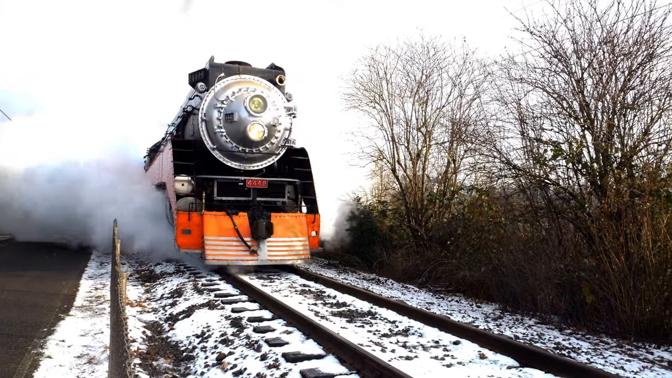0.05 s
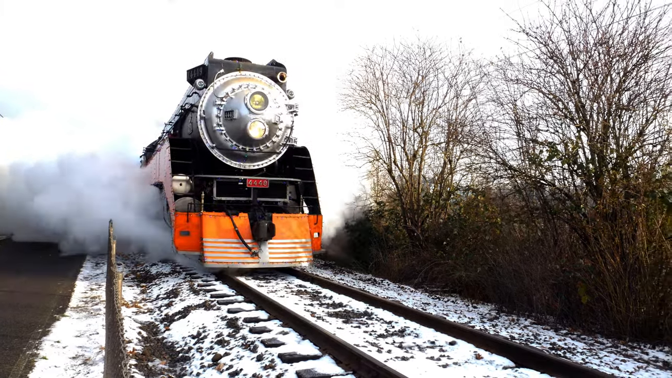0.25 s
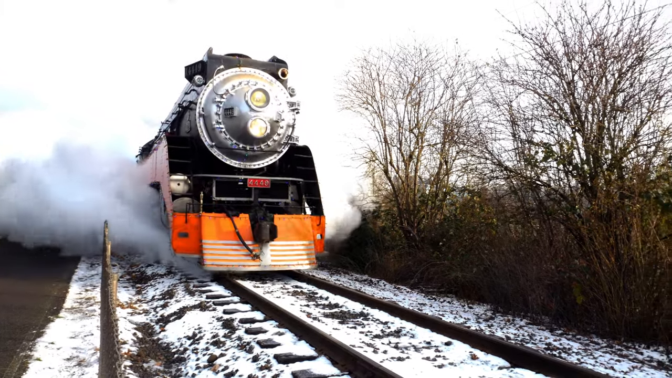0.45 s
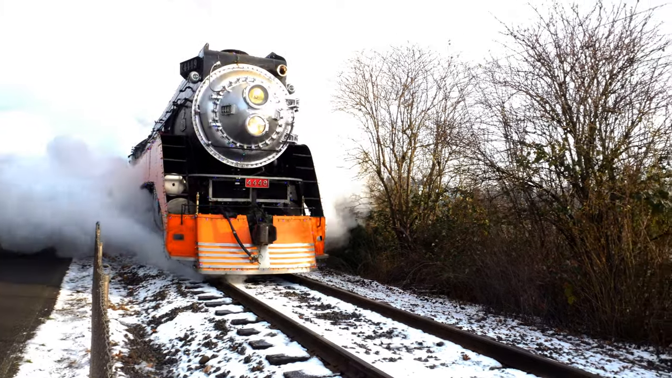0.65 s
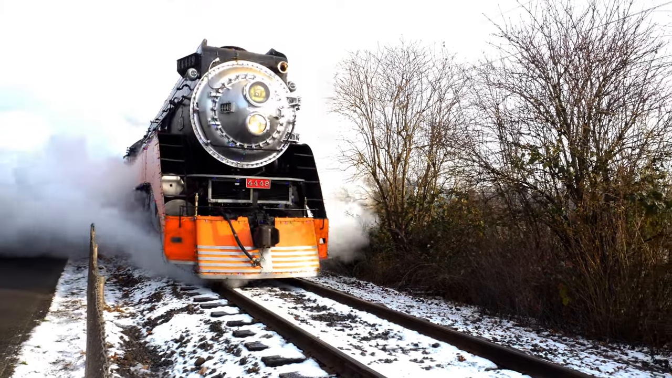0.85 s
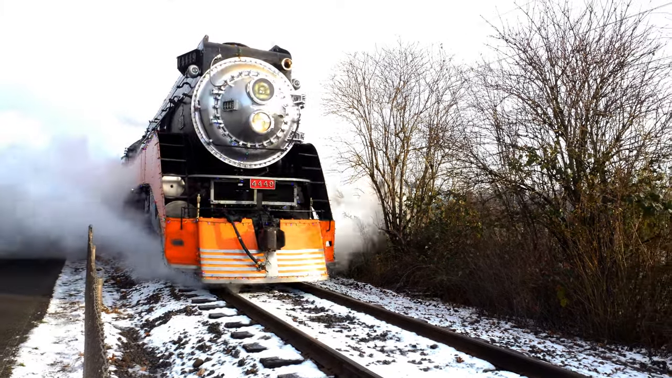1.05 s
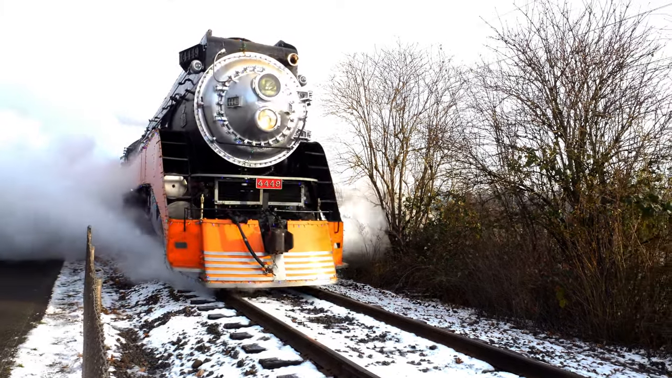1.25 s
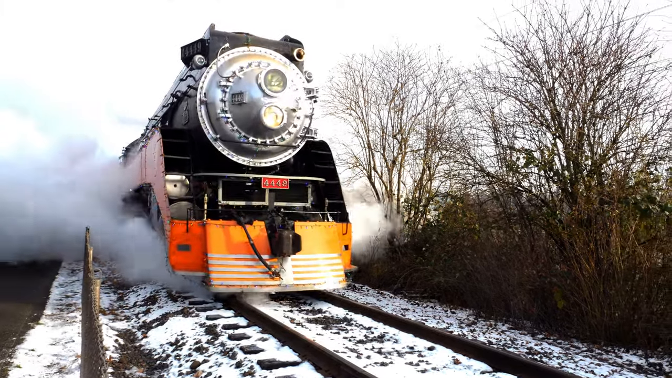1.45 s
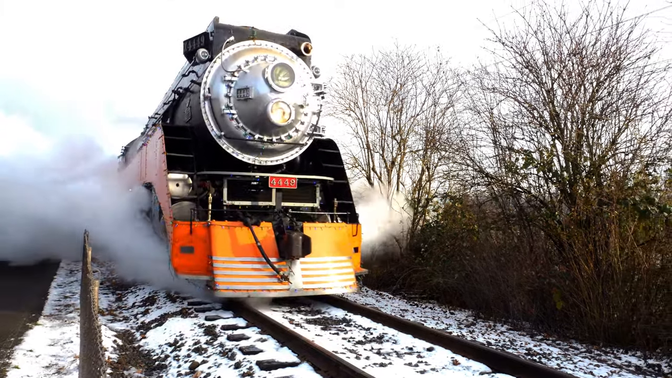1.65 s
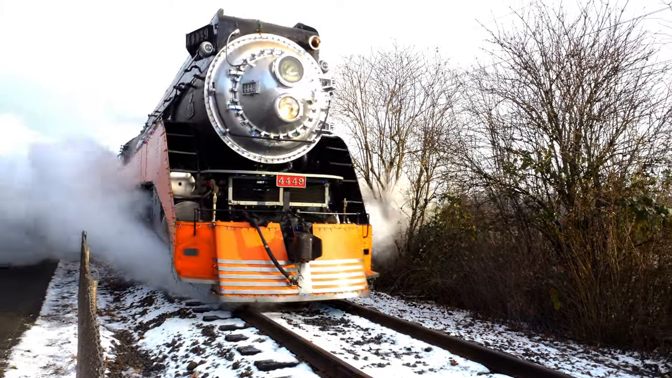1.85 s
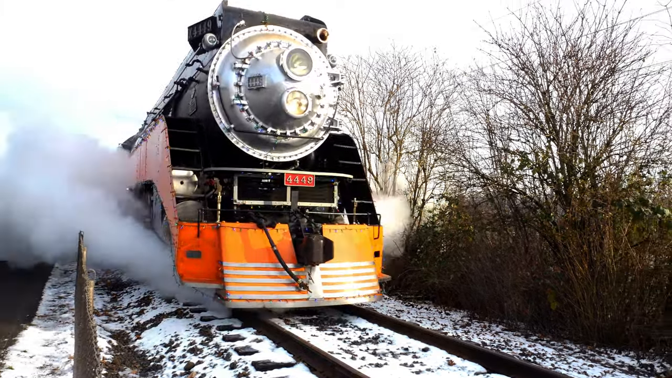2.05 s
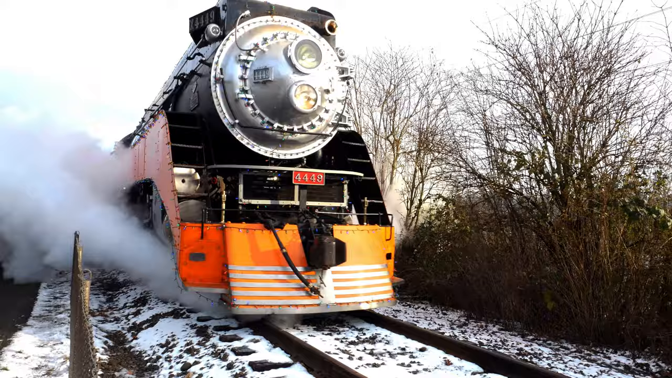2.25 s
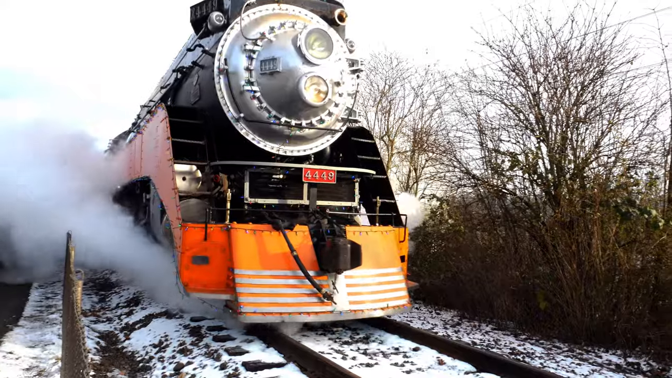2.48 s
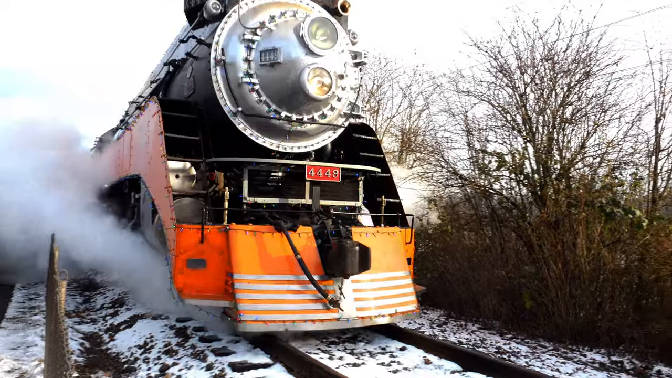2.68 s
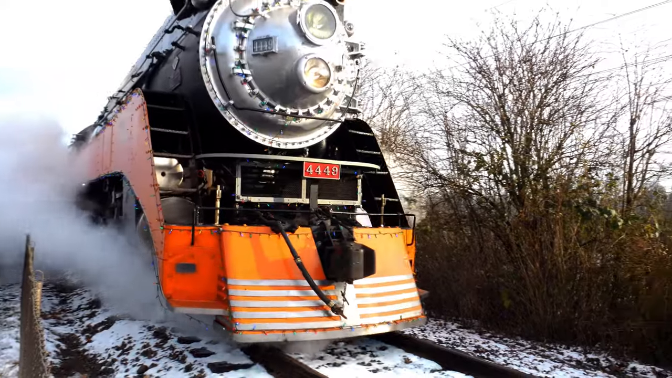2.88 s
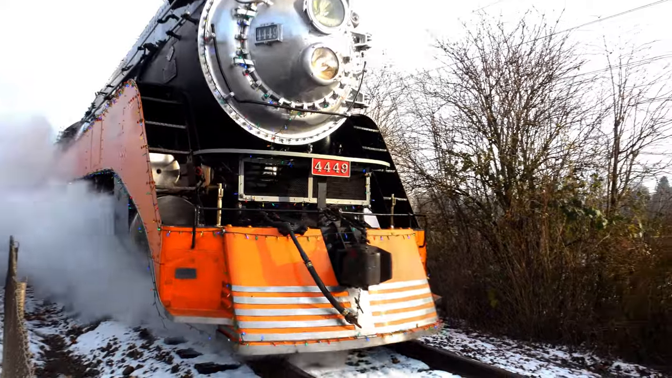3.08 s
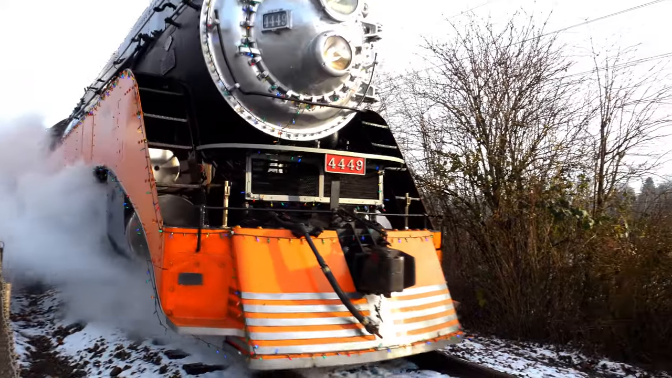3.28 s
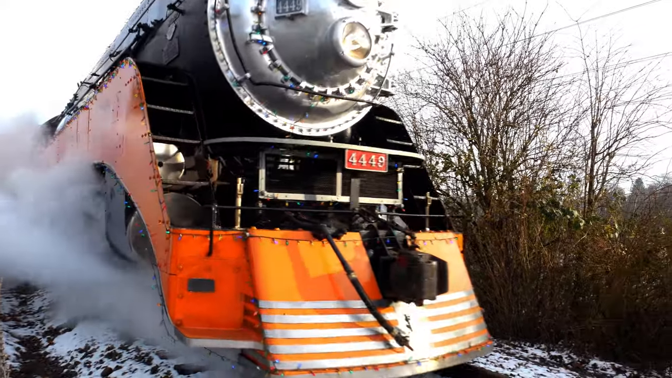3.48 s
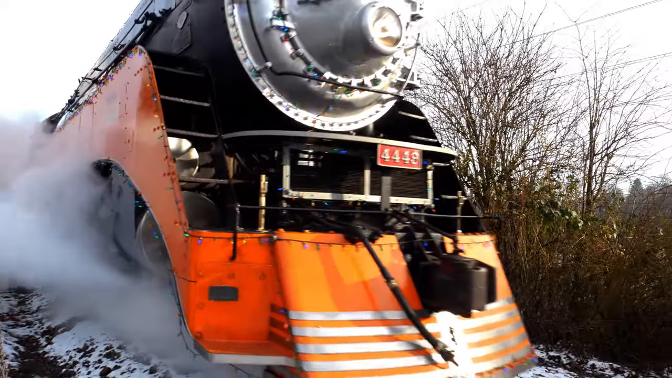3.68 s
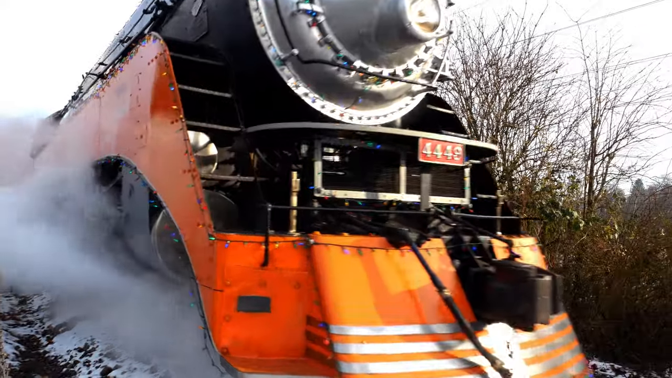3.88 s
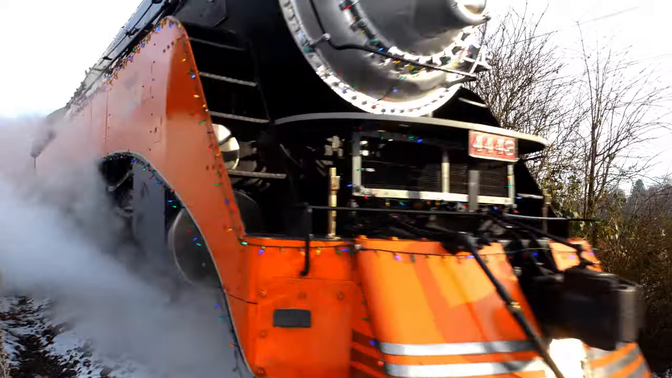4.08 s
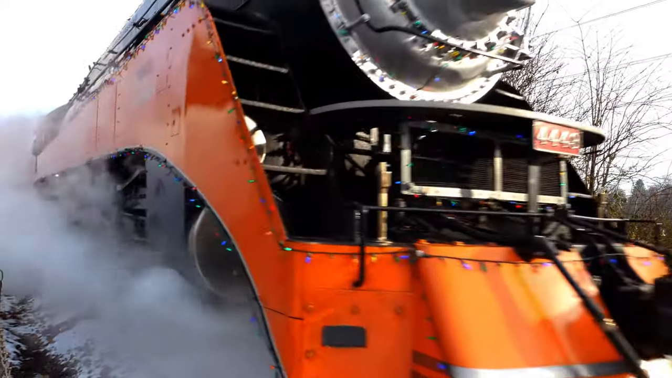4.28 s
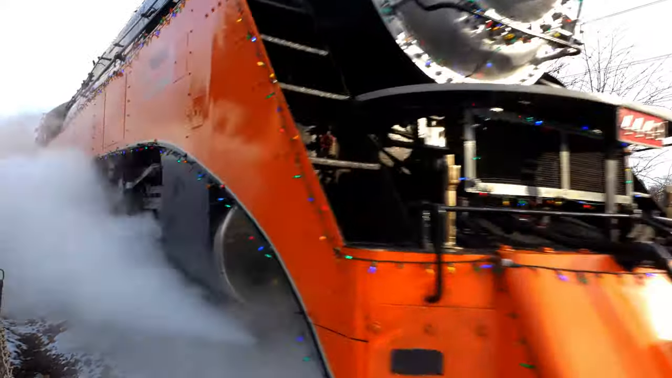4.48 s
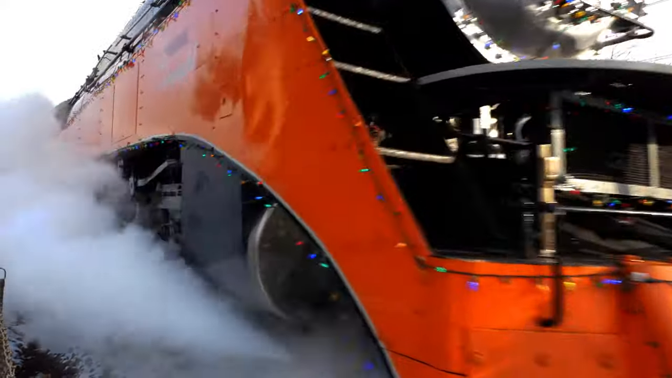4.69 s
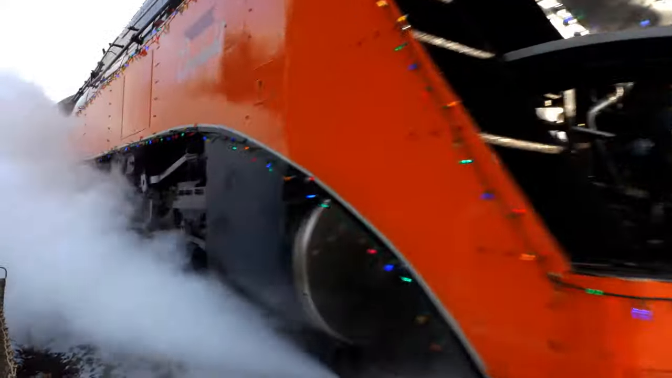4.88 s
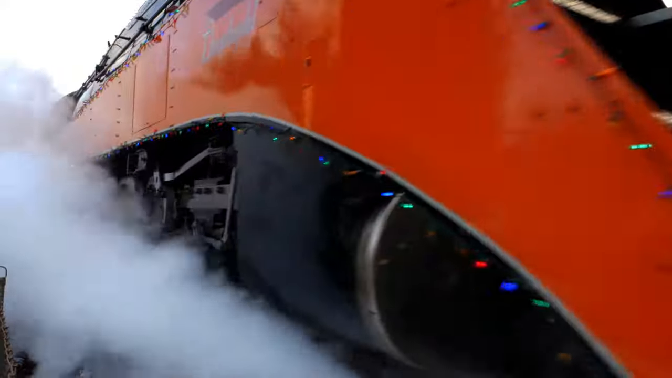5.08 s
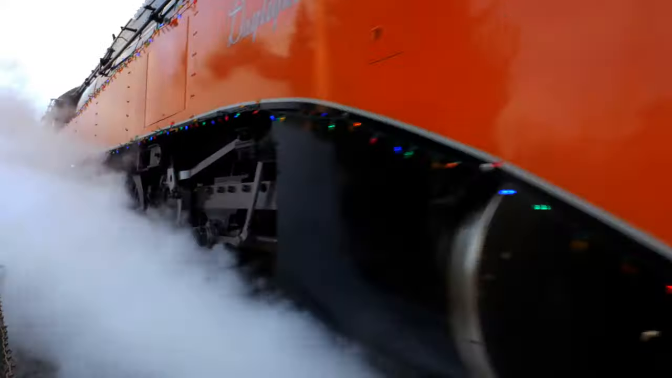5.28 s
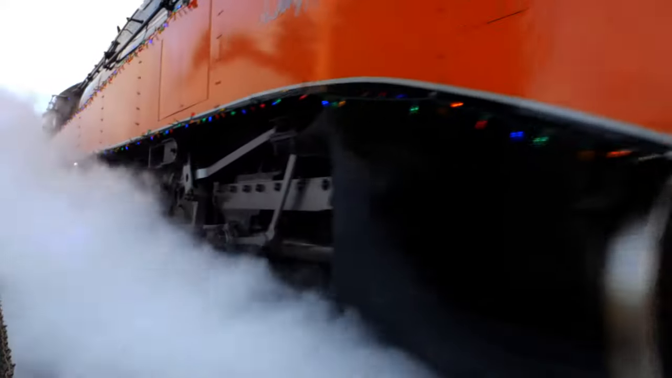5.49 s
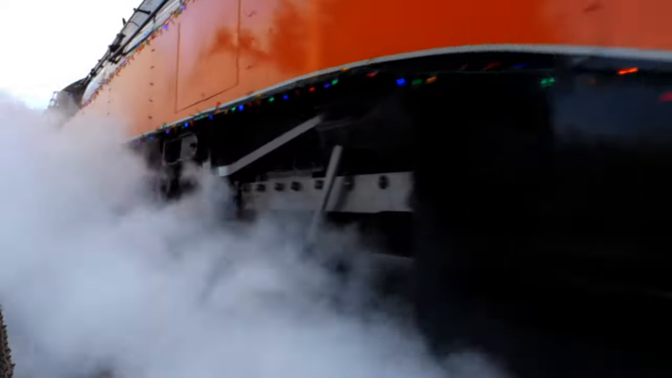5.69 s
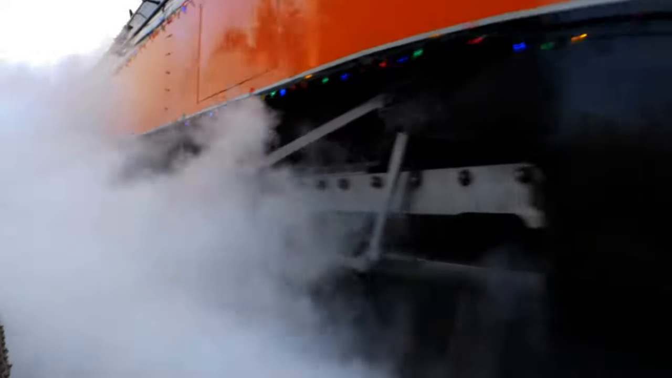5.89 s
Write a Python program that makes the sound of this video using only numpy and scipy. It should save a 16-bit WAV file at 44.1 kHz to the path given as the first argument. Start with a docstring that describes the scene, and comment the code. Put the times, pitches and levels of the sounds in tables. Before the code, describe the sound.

A steam locomotive rolls slowly towards a trackside microphone outdoors. From the start, steam hisses continuously: a rough billowing roar, light fizz and a hoarse, wavering ring near 3 kHz. It surges with piston strokes at about 0-0.5, 0.8-1.2, 1.8-2.25, 2.55-3.1 and 3.3-4 seconds, growing fuller and brighter. Beneath, soft hollow low chuffs fall slightly in pitch, at roughly 0.6, 1.4, 2.1, 2.9, 3.6, 4.3 and 5.7 seconds, with deeper boom as they near. Wheels and rods add a quiet, lumpy rumble. Around 4-4.4 the jets ahead drop as the front draws level. At 4.45 a nearby cock coughs open and builds into a huge, dense, fizzing blast with low wind buffeting, roughened by microphone overload. It shuts abruptly near 5.6, leaving a brief weaker hiss, then a faster, thumping second blast starts at about 5.77 and lasts to the end. Narrow stereo, dry.

```python
"""Steam jets hiss and ring hoarsely near 3 kHz as a steam locomotive rolls slowly up, cylinder cocks open.
The jets are noise shaped into a roar, a fizz and a ring, which surge with the piston strokes.
Then the nearest cock blows straight past, one long blast and one short, and overloads the microphone.
Behind the jets, soft chuffs from the stack come roughly every three quarters of a second: noise in
gliding resonances. The wheels and rods add a lumpy low rumble of filtered noise."""
import sys
import numpy as np
from scipy import signal
from scipy.io import wavfile
from scipy.ndimage import uniform_filter1d

SR = 44100
rng = np.random.default_rng(int(sys.argv[2]) if len(sys.argv) > 2 else 0)


def master_out(mix):
    """Clip the mix to full scale and print it as 16-bit PCM to the path in sys.argv[1]."""
    frames = np.transpose(np.atleast_2d(mix))
    ceiling = np.clip(frames, -1, 1)
    pcm = np.round(ceiling * 32767).astype(np.int16)
    wavfile.write(sys.argv[1], SR, pcm)


N = 261951  # length in samples

# spectrum shapes of the jets' roar and fizz; only the shape counts: f/Hz, density/dB
JET_ROAR_SPECTRUM = [(100, -42), (450, -15.5), (800, -9), (1150, -5.5), (1650, -1.5), (2100, -2.5),
                     (2700, 0), (4000, -1), (4700, -6), (5500, -10), (8000, -13), (16000, -37)]
JET_FIZZ_SPECTRUM = [(2000, -26), (4000, 1.5), (5500, -2), (6600, -1.5), (8500, -3.5), (12000, -5),
                     (14000, -9), (16000, -14)]
# surges that the piston strokes drive through the open cocks; each part of the sound
# takes its own share of the strength: start/s, end/s, strength/dB
STROKES = [(0.032, 0.513, 2.0), (.78, 1.238, 2.0), (1.766, 2.25, 2.5), (2.55, 3.146, 3),
           (3.288, 4.015, 3.5)]
# centre of the hoarse ring of the cock mouths: t/s, f/Hz
RING_CENTRE = [(0.0, 3560), (0.1, 3320), (0.89, 2980), (0.92, 3250), (3.35, 3170), (3.47, 3350),
               (3.52, 3240), (4.21, 3340), (4.29, 3180), (4.52, 3400), (4.73, 3160), (4.78, 3340),
               (5.27, 3250), (5.36, 3100), (5.9, 3180)]
# chance hollow tints in the hiss: t at the top/s, level/dB, length/s, centre f/Hz, width/Hz
HOLLOW_TINTS = [(.35, -35, 1.5, 930, 276), (1.35, -38, 0.5, 1150, 130), (2.62, -29, 0.5, 1820, 120),
                (3.15, -31.5, 0.52, 1600, 130), (3.4, -33, 0.37, 1130, 130)]
# blasts of the nearest cock: opens/s, shut/s, pressure build-up time/s, pressure/dB
BLASTS = [(4.436, 5.615, 0.16, -0.5), (5.765, 6.1, 0.035, 0.2)]
# spectrum shapes of the blasts' roar, fizz and wind on the microphone: f/Hz, density/dB
BLAST_ROAR_SPECTRUM = [(40, -29), (300, -14), (550, -8), (900, -3.5), (1300, -1), (2000, 1.5), (2800, 0),
                       (4300, -3), (5500, -4.5), (9000, -15.5), (16000, -41)]
BLAST_FIZZ_SPECTRUM = [(1500, -8), (3500, -2), (4800, -1), (5700, -3), (7200, 0.5), (9000, -0.5),
                       (12000, -2.5), (14500, -4.5), (16000, -12)]
WIND_SPECTRUM = [(15, -8), (45, -5), (90, -3), (160, -5.5), (300, -14), (800, -26)]
# brief gusts as the cock coughs open or its wind thumps the microphone:
# t at the top/s, level/dB, length/s, centre f/Hz, width/Hz
PUFFS = [(4.458, -26, 0.051, 804, 700), (4.56, -37, .06, 65, 70), (5.786, -23.5, 0.029, 330, 170),
         (5.795, -21, 0.064, 900, 500), (5.91, -18, 0.037, 60, 110)]
# exhaust beats: t at the top/s, level/dB, length/s, stack resonance at the top f/Hz
CHUFFS = [(0.605, -32, 0.19, 208), (1.381, -35, 0.14, 188), (2.136, -35, 0.14, 180.6),
          (2.877, -31, 0.18, 197), (3.631, -39, 0.2, 191), (4.275, -35, 0.12, 222),
          (5.667, -33.5, 0.13, 193.5)]
# spectrum shape of the wheels and rods: f/Hz, density/dB
GEAR_SPECTRUM = [(20, -10), (45, -2.5), (90, 0.5), (170, 1), (300, -2), (500, -2), (750, 0.5), (1200, -3.5),
                 (3000, -40)]
# the stereo difference relative to the middle, before it wavers: f/Hz, level/dB
STEREO_WIDTH = [(30, -17.5), (500, -18), (1400, -20.5), (3200, -22), (5000, -16), (8000, -17.5),
                (15000, -16.5)]

STROKE_RAMP_S = .25  # time for a surge to rise or fall
# the jets grow as the engine nears, fall away while its front draws level, then recede
LEVEL_FROM_S, LEVEL_TAKES_S, RECEDE_DB_PER_S = 3.95, 0.45, 1.5
SHUT_S, LEAK_DB = 0.081, -23.5  # the valve's closing time; the least pressure once it has first opened
ROAR_LAW, RING_LAW = 0.28, 0.51  # roar and ring grow as these powers of the pressure
# a beat's deep boom, relative to the beat, grows with the approach up to the near level
BOOM_FAR_DB, BOOM_DB_PER_S, BOOM_NEAR_DB = -20, 5.5, 3
EDGE_HZ = 15850  # top of the sound
FRAME, HOP = 1024, 256  # short-time frame and step in samples
HZ = np.fft.rfftfreq(FRAME, 1 / SR)  # frequency of each bin
T = np.arange(N // HOP + 5) * HOP / SR  # time of each frame in seconds


def jets():
    """Steam beside the cylinders: a billowing roar, and a fizz that grows faster as the engine nears."""
    roar_db = approach(far_db=-22.5, db_per_s=0.79, surge=.9, drop_db=5.5)
    fizz_db = approach(far_db=-31.0, db_per_s=2.5, surge=0.6, drop_db=10.0)
    roar_billow = eddies(depth_db=2.0, life=0.21, span_hz=208)
    fizz_billow = eddies(depth_db=1.0, life=0.2, span_hz=350)
    roar = gain_of(roar_db) * unit(colour(JET_ROAR_SPECTRUM)) * roar_billow
    fizz = gain_of(fizz_db) * unit(colour(JET_FIZZ_SPECTRUM)) * fizz_billow
    sputter = eddies(depth_db=.5, life=0.017, span_hz=7000)
    return noise(np.hypot(roar, fizz) * sputter)


def cock_ring(body_db=-4.0, core_db=-3, near_db=-16.0, fade_db_per_s=6.0):
    """Jets excite the cock mouths: a broad unsteady ring, a narrower whistling core; the nearest fades."""
    hz, = follow(RING_CENTRE)
    ahead = gain_of(approach(far_db=-25.0, db_per_s=0.68, surge=0.91, drop_db=2.0))
    since_opening = T[:, None] - BLASTS[0][0]
    nearest = cock_pressure() ** RING_LAW * gain_of(near_db - fade_db_per_s * since_opening)
    body_eddies = eddies(depth_db=1.8, life=0.06, span_hz=500)
    core_eddies = eddies(depth_db=2, life=.1, span_hz=120)
    body = unit(resonance(hz, width_hz=680)) * gain_of(body_db) * body_eddies
    core = unit(resonance(hz, width_hz=260)) * gain_of(core_db) * core_eddies
    flutter = eddies(depth_db=0.8, life=0.13, span_hz=5000)
    return noise(np.hypot(ahead, nearest) * np.hypot(body, core) * flutter)


def hollow_tints():
    """Chance hollow tints in the hiss: noise that swells and fades around one pitch."""
    return gusts(HOLLOW_TINTS)


def blasts(roar_db=-14.0, fizz_db=-10.6, wind_db=-29):
    """Steam from the nearest cock: roar builds first, then fizz, and the jet's wind on the microphone."""
    pressure = cock_pressure()
    roar_eddies = eddies(depth_db=2.5, life=0.11, span_hz=200)
    fizz_eddies = eddies(depth_db=0.3, life=0.071, span_hz=710)
    wind_eddies = eddies(depth_db=1.0, life=0.092, span_hz=120)
    roar = gain_of(roar_db) * pressure ** ROAR_LAW * unit(colour(BLAST_ROAR_SPECTRUM)) * roar_eddies
    fizz = gain_of(fizz_db) * pressure * unit(colour(BLAST_FIZZ_SPECTRUM)) * fizz_eddies
    wind = gain_of(wind_db) * pressure * unit(colour(WIND_SPECTRUM)) * wind_eddies
    return noise(np.sqrt(roar ** 2 + fizz ** 2 + wind ** 2))


def puffs():
    """Short bursts of turbulence as the cock coughs open or its wind thumps the microphone."""
    return gusts(PUFFS)


def chuffs(fall_hz=240, boom_hz=107, overtone_db=-13):
    """Each beat is a hollow gust up the stack; its pitch sinks by fall_hz a second as pressure drops."""
    t, beats = np.arange(N) / SR, 0
    # each beat also stirs a loose low resonance of the smokebox, stronger close up
    smokebox = hollow(boom_hz, width_hz=28)
    for s, db, length, hz in CHUFFS:
        sinking = hz - fall_hz * np.clip(t - s, -length, length)
        overtone = gain_of(overtone_db) * hollow(2 * sinking, width_hz=170)
        stack = hollow(sinking, width_hz=78) + overtone
        boom_db = min(BOOM_FAR_DB + BOOM_DB_PER_S * s, BOOM_NEAR_DB)
        boom = gain_of(boom_db) * smokebox
        envelope = np.interp(t, T, swell(s, length)[:, 0])
        beats = beats + gain_of(db) * envelope * (stack + boom)
    return beats


def running_gear():
    """A lumpy low rumble of wheels and rods that grows with the approach and leans on each stroke."""
    level_db = approach(far_db=-42.5, db_per_s=1.88, surge=0.37, drop_db=3)
    lumps = eddies(depth_db=2.8, life=0.16, span_hz=150)
    return noise(gain_of(level_db) * unit(colour(GEAR_SPECTRUM)) * lumps)


def approach(far_db, db_per_s, surge, drop_db):
    """Level of one part: grows with the approach, surges with each stroke, drops as the front goes by."""
    t = T[:, None]
    strokes_db = 0
    for start, end, db in STROKES:
        rise = ramp(start - STROKE_RAMP_S / 2, STROKE_RAMP_S)
        fall = ramp(end - STROKE_RAMP_S / 2, STROKE_RAMP_S)
        strokes_db = strokes_db + db * (rise - fall)
    receding_s = np.maximum(t - LEVEL_FROM_S - LEVEL_TAKES_S, 0)
    passing_db = drop_db * ramp(LEVEL_FROM_S, LEVEL_TAKES_S) + RECEDE_DB_PER_S * receding_s
    return far_db + db_per_s * np.minimum(t, LEVEL_FROM_S) + surge * strokes_db - passing_db


def cock_pressure():
    """Nearest cock's pressure: it builds when the valve opens, holds, and falls to a leak when it shuts."""
    t, pressure = T[:, None], 0
    for opens, shut, build, db in BLASTS:
        building = 1 - np.exp(-np.maximum(t - opens, 0) / build)
        closing = 1 - ramp(shut - SHUT_S, SHUT_S)
        pressure = pressure + gain_of(db) * building * closing
    leak = gain_of(LEAK_DB) * (t > BLASTS[0][0])
    return np.maximum(pressure, leak)


def gusts(rows):
    """Turbulence that swells and fades in one resonance for each row."""
    field = 0
    for s, db, length, hz, width in rows:
        field = field + gain_of(db) * swell(s, length) * unit(resonance(hz, width))
    return noise(field)


def hollow(hz, width_hz):
    """Turbulence ringing in one narrow resonance that follows the curve hz; rms one."""
    smooth = signal.butter(2, width_hz / 2, fs=SR, output="sos")
    # slow complex noise, shifted up to the resonance
    flutter = signal.sosfilt(smooth, rng.standard_normal(N) + 1j * rng.standard_normal(N))
    phase = 2 * np.pi * np.cumsum(hz * np.ones(N)) / SR
    return evened((flutter * np.exp(1j * phase)).real)


def noise(field):
    """Turbulence with the given short-time spectrum."""
    white = rng.standard_normal(len(T) * HOP)
    z = signal.stft(white, nperseg=FRAME, noverlap=FRAME - HOP)[2][:, :len(T)]
    shaped = z * field.T * np.sqrt(len(HZ))
    return signal.istft(shaped, nperseg=FRAME, noverlap=FRAME - HOP)[1][:N]


def eddies(depth_db, life, span_hz):
    """Random patches of gain, each lasting about life seconds and about span_hz wide."""
    field = rng.standard_normal((len(T), len(HZ)))
    rate = np.fft.fftfreq(len(T), HOP / SR)[:, None]
    ripple = np.fft.rfftfreq(len(HZ), HZ[1])
    blur = np.exp(-(rate * life) ** 2 - (ripple * span_hz) ** 2)
    smooth = np.fft.irfft2(np.fft.rfft2(field) * blur, field.shape)
    return gain_of(depth_db * evened(smooth))


def gain_of(db):
    """Decibels to amplitude."""
    return 10 ** (np.asarray(db) / 20)


def evened(x):
    """Scales to an rms of one."""
    return x / np.sqrt(np.mean(x ** 2) + 1e-20)


def colour(points):
    """A spectrum as a gain for each bin."""
    hz, db = np.transpose(points)
    return gain_of(np.interp(np.log(HZ + 1), np.log(hz), db))


def follow(rows):
    """Each column of a curve as a value for each frame."""
    s, *columns = np.transpose(rows)
    return [np.interp(T, s, c)[:, None] for c in columns]


def resonance(hz, width_hz):
    """A resonance as a gain for each bin; its width is taken at half power."""
    return 1 / (1 + ((HZ - hz) / (.78 * width_hz)) ** 2)


def unit(shape):
    """Scales a spectrum to a total power of one."""
    return shape / np.sqrt(np.sum(shape ** 2, axis=-1, keepdims=True))


def swell(s, length):
    """A smooth rise and fall around the moment s."""
    return np.exp(-(2 * (T[:, None] - s) / length) ** 2)


def ramp(start, length):
    """Rises from zero to one over length seconds."""
    return np.clip((T[:, None] - start) / length, 0, 1)


def widen(mid):
    """Both ears hear nearly the same sound; separate noise adds a slight, wavering stereo width."""
    padded = np.pad(mid, (0, FRAME * 2))
    z = signal.stft(padded, nperseg=FRAME, noverlap=FRAME - HOP)[2][:, :len(T)]
    loudness = np.sqrt(uniform_filter1d(abs(z.T) ** 2, size=9, axis=1).clip(0))
    waver = np.minimum(eddies(depth_db=6, life=.15, span_hz=40000), 1.7)
    side = noise(loudness * colour(STEREO_WIDTH) * waver)
    return np.array([mid + side, mid - side])


def scene():
    """All the steam and the rolling engine."""
    ahead = jets() + cock_ring() + hollow_tints()
    close = blasts() + puffs()
    return widen(ahead + close + chuffs() + running_gear())


def record(dry):
    """The microphone amplifier saturates, which flattens and roughens loud peaks; then the band limit."""
    ceiling, knee = .48, 6  # largest amplitude; a higher knee bends more sharply
    squashed = dry / (1 + abs(dry / ceiling) ** knee) ** (1 / knee)
    lowpass = signal.firwin(511, EDGE_HZ, window=("kaiser", 9), fs=SR)
    return signal.oaconvolve(squashed, lowpass[None], "same")


dry = scene()
out = record(dry)
master_out(out)
```